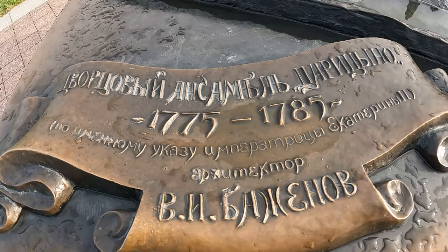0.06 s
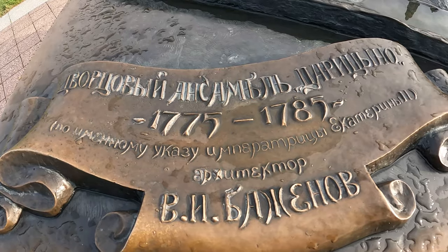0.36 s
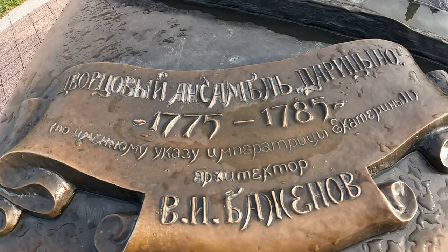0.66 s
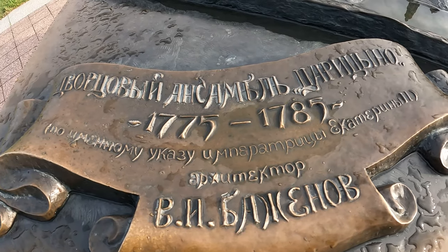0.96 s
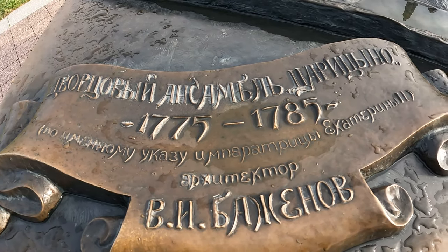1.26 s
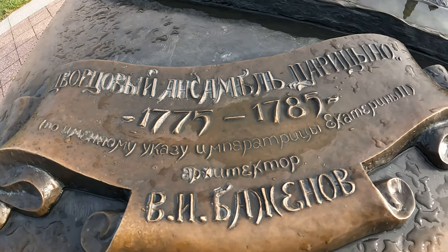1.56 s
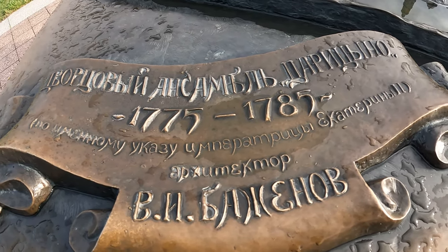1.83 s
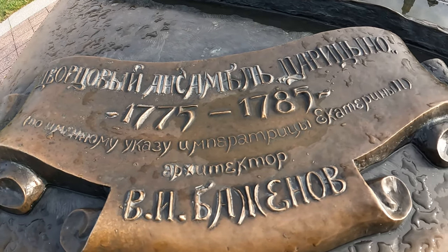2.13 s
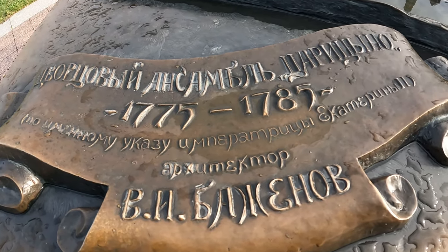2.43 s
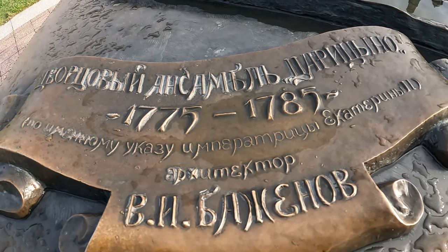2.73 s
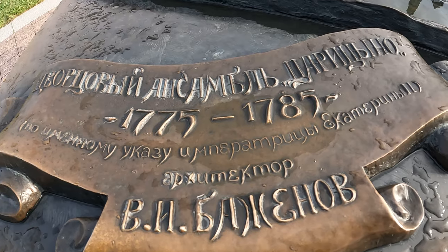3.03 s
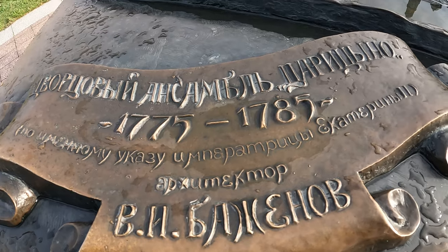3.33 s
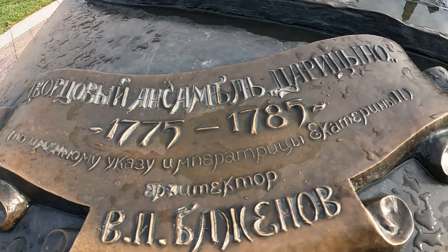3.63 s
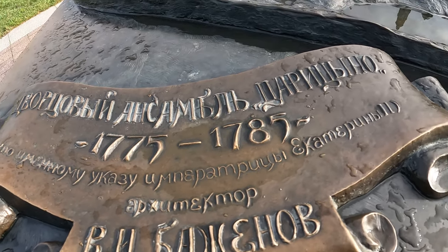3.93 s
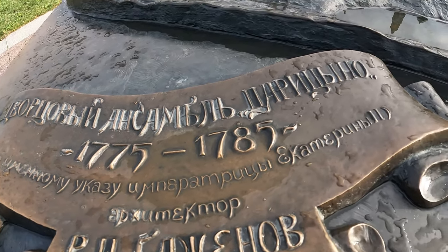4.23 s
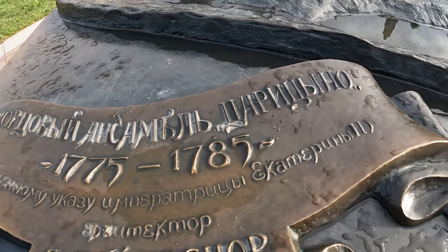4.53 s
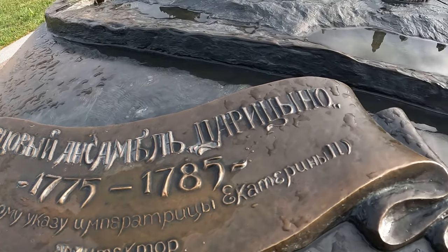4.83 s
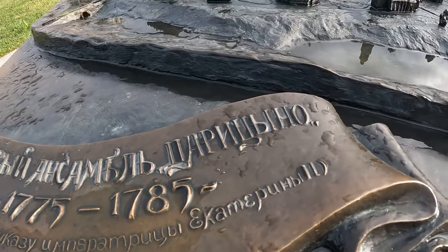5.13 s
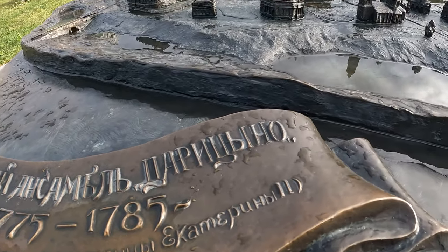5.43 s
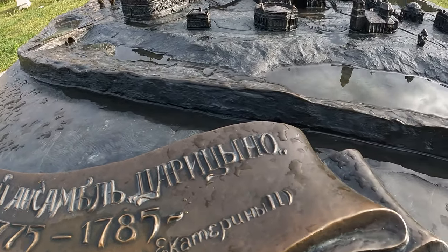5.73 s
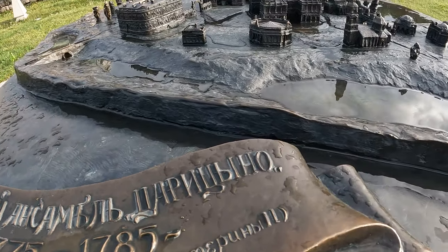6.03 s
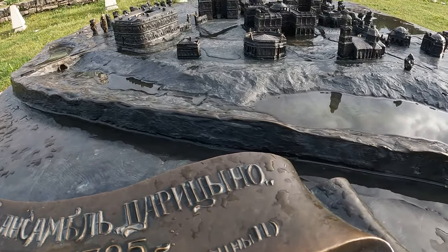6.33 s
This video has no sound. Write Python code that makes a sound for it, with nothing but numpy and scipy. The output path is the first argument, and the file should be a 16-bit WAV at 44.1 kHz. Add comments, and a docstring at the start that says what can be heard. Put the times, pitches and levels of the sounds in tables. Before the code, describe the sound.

A firm, close click on a hand-held camera comes right at the start, with a low buffet of breeze. The sound drops out for an instant and fades back by about 0.2 seconds into distant road traffic heard from an open park: a steady low engine rumble under dull tyre hiss. It eases slightly around 1.5 seconds, then builds gently and widens from about 2.5 seconds, with very faint thin whines near 5 seconds.

Throughout, fingers shift on the camera, close and mostly on the left. Small ticks come at 0.6 seconds, a soft thud at 1.1, and faint skin rubbing follows. Around 3.2 seconds there are more ticks and a tiny, faint falling squeak. Light ticks scatter between 4 and 4.7 seconds, ending in a brief rub. Another low thud with ticks lands near 5.5 seconds, and a sharper tick at 6.3.

```python
"""Open park: far traffic, engine rumble under a wash of tyre noise, with a few thin whines.
A hand-held camera clicks once; the sound drops out, fades back in near mono and slowly widens.
Fingers shift on the case: ticks ring its modes, nudges thud, skin rubs close to the left microphone.
Breeze and brief handling thuds buffet the microphones; one faint squeak falls in pitch."""
import sys
import numpy as np
from scipy import signal
from scipy.fft import rfft, irfft, next_fast_len
from scipy.io import wavfile
from scipy.ndimage import uniform_filter1d, map_coordinates

SR = 44100
rng = np.random.default_rng(int(sys.argv[2]) if len(sys.argv) > 2 else 0)


def waveform_to_disk(signal):
    """Save audio, clipped to [-1, 1], as 16-bit WAV at the path in sys.argv[1]."""
    frames = np.transpose(np.atleast_2d(signal))
    scaled = np.clip(frames, -1, 1) * 32767
    samples = np.round(scaled).astype(np.int16)
    wavfile.write(sys.argv[1], SR, samples)


N = 280917
TOP_HZ = 15600  # camera band limit


def amp(db):
    """Decibels to gain."""
    return 10 ** (np.asarray(db) / 20)


def unit(x):
    """x at rms 1."""
    return x / np.sqrt(np.mean(x ** 2) + 1e-20)


def gain_at(spectrum, hz):
    """Gain from (f/Hz, level/dB) points, interpolated over log frequency."""
    f, db = np.transpose(spectrum)
    return amp(np.interp(np.log(hz + 1), np.log(f + 1), db))


def curve(points):
    """(t/s, value) points, interpolated per sample."""
    return np.interp(np.arange(N) / SR, *np.transpose(points))


def wobble(rate_hz):
    """Smooth random curve, rate_hz knots a second."""
    knots = rng.standard_normal(int(N * rate_hz / SR) + 4)
    return map_coordinates(knots, [np.arange(N) * rate_hz / SR])


def swell(peak_s, half_width_s):
    """Gaussian envelope: 1 at the peak, 1/e at the half-width."""
    return np.exp(-((np.arange(N) / SR - peak_s) / half_width_s) ** 2)


def filtered(x, response):
    """Zero-phase filter with gain response(hz)."""
    size = next_fast_len(N + SR // 2)
    return irfft(rfft(x, size) * response(np.fft.rfftfreq(size, 1 / SR)), size)[..., :N]


def add(track, start_s, sound):
    """Mix a stereo sound into the track."""
    part = track[:, max(0, round(start_s * SR)):][:, :sound.shape[1]]
    part += sound[:, :part.shape[1]]


def pan(left_db):
    """Stereo gains, left_db louder on the left."""
    return amp([[left_db / 2], [-left_db / 2]])


def far_noise(spectrum, patchy_db):
    """Stereo noise, mid at rms 1; moving air makes patches of it swell and fade."""
    side_gain = [(60, -33.5), (200, -34), (450, -14), (1000, -11.5), (1700, -0.5), (2300, -2), (3000, -7.5),
                 (8000, -2.5)]  # side against mid: f/Hz, level/dB
    bins = signal.stft(rng.standard_normal((2, N)), nperseg=1024)[2]
    patches = uniform_filter1d(rng.standard_normal(bins.shape[1:]), size=6, axis=0)
    patches = uniform_filter1d(patches, size=10, axis=1)
    pair = signal.istft(bins * amp(patchy_db * unit(patches)), nperseg=1024)[1][:, :N]
    mid, side = filtered(pair, lambda hz: gain_at(spectrum, hz) * (hz < 2 * spectrum[-1][0]))
    side = filtered(side, lambda hz: gain_at(side_gain, hz))
    return np.array([mid + side, mid - side]) / np.std(mid)


def engines():
    """Many exhausts blur into low rumble, drone and wavering notes, which start louder and settle."""
    rumble_spectrum = [(12, -16), (22, -7.5), (36, 1), (54, -2.5), (72, -4.5), (97, -4), (125, -9),
                       (165, -21), (300, -63.5)]  # deep exhaust noise: f/Hz, level/dB
    drone_spectrum = [(80, -28.5), (130, 0), (165, -1.5), (205, 1.5), (240, -2), (315, -3), (400, -7.5),
                      (500, -13.5), (700, -21.5), (1500, -71.5)]  # low-mid exhaust noise: f/Hz, level/dB
    engine_notes = [(53.77, 19, -38.5, 7.5), (100.7, 8, -50, -4), (213.8, 8, -60.5, 16.5),
                    (352.6, 14, -60.5, 15.5)]  # steady notes: f/Hz, waver rate/Hz, level/dB, lift at opening/dB
    rumble_db, rumble_lift_db, lift_below_hz = -34.5, 5.5, 104
    drone_db, drone_lift_db, sag_db_per_s = -40, 6.5, 0.48
    t = np.arange(N) / SR
    opening_swell = swell(peak_s=0.18, half_width_s=0.67)
    rumble = amp(rumble_db + 0.58 * wobble(9.3)) * far_noise(rumble_spectrum, patchy_db=0.13)
    deep = filtered(rumble, lambda hz: 1 / (1 + (hz / lift_below_hz) ** 8))
    out = rumble - deep + deep * amp(rumble_lift_db * opening_swell)
    drone = far_noise(drone_spectrum, patchy_db=1.0)
    out += amp(drone_db + drone_lift_db * opening_swell - sag_db_per_s * t) * drone
    for hz, waver_hz, db, lift_db in engine_notes:
        flutter = 1 + 0.58 * wobble(waver_hz)
        note = np.cos(2 * np.pi * hz * t + 0.89 * wobble(waver_hz))
        out += amp(db + lift_db * opening_swell) * unit(flutter * note)
    return out


def tyres():
    """Tyre roar, dulled by distance, under thin hiss; more traffic is louder and brighter."""
    traffic_flow = [(0.35, -42), (0.8, -45.5), (1.5, -48), (2.1, -46.5), (3.5, -45.5), (4.15, -44),
                    (5.1, -43.5), (5.8, -44), (6.25, -42.5)]  # stream of cars: t/s, level/dB
    roar_spectrum = [(250, -14.5), (480, -9), (590, -1.5), (640, -3.5), (715, 2.1), (780, -0.5), (850, -4),
                     (950, -3), (1120, -8), (1300, -18.5), (2000, -35), (4000, -73.5)]  # tyre roar: f/Hz, level/dB
    hiss_spectrum = [(700, -26), (1200, 2.5), (1440, 4), (1700, 1), (2000, -3), (2300, -9), (3000, -19.5),
                     (5000, -57.5)]  # tyre hiss: f/Hz, level/dB
    treble_spectrum = [(1200, -24.5), (2100, 0), (2600, 2), (3300, -1.5), (4700, -8.5), (6300, -16),
                       (7700, -20.5), (9000, -37), (11000, -43.5), (12200, -35), (13500, -48.5)]  # high hiss: f/Hz, level/dB
    treble_contour = [(0.3, -62.5), (0.95, -67), (1.7, -64), (2.6, -68), (3.6, -68.5), (4.4, -66.5),
                      (5.1, -65.5), (5.9, -64)]  # high hiss contour: t/s, level/dB
    flow_db = curve(traffic_flow)
    mean_db = flow_db.mean()
    surge_db = flow_db - mean_db
    roar_db = mean_db + 0.4 + 0.85 * surge_db + 0.15 * wobble(6.0)
    roar = amp(roar_db) * far_noise(roar_spectrum, patchy_db=0.85)
    hiss = amp(mean_db - 10 + 1.4 * surge_db) * far_noise(hiss_spectrum, patchy_db=0.8)
    treble = amp(curve(treble_contour) + 1) * far_noise(treble_spectrum, patchy_db=1.5)
    return (roar + hiss + treble) * pan(1.5)


def buffets():
    """Low buffets at the microphones: breeze and brief handling thuds, independent noise per side."""
    bursts = [(0.036, 0.12, -23.5), (1.126, 0.013, -31), (4.693, 0.12, -38.5), (5.464, 0.062, -32)]  # low buffets: peak t/s, half-width/s, level/dB
    buffet_spectrum = [(20, 6), (70, -13.5), (200, -12.5), (500, -25.5), (1500, -39), (5000, -51),
                       (12000, -66), (15500, -92.5)]  # buffet noise: f/Hz, level/dB
    strength = sum(amp(db) * swell(peak_s, half_width_s) for peak_s, half_width_s, db in bursts)
    return strength * unit(filtered(rng.standard_normal((2, N)), lambda hz: gain_at(buffet_spectrum, hz)))


def case_ring(t, attack_s, favoured_hz=None):
    """Short case modes; those near the pitch the touched spot favours ring louder and longer."""
    modes = [(1127, -7, 3.5, 0.015), (1560, 4, 5, 0.0071), (2020, -1, 1.5, 0.015), (2910, -24, 0.5, 0.0053),
             (3270, -10.5, -7.5, 0.01), (4600, -13.5, -34, 0.0042), (6200, -9.5, -33, 0.0057),
             (7550, 2, -22, 0.005), (9880, -10, -32.5, 0.0057), (12160, -9.5, -50, 0.0044)]  # case modes: f/Hz, left level/dB, right level/dB, T60/s
    favour_db, reach_octaves, left_lag_s = 7, 0.2, 0.00032
    out = np.zeros((2, len(t)))
    t = np.maximum(t - np.array([[left_lag_s], [0]]), 0)
    for hz, left_db, right_db, t60_s in modes:
        near = np.exp(-(np.log2(hz / favoured_hz) / reach_octaves) ** 2) if favoured_hz else 0
        db = rng.normal(0, 1) + favour_db * near - 60 * t / (t60_s * (1 + near))
        out += amp([[left_db], [right_db]]) * amp(db) * np.sin(2 * np.pi * hz * t)
    return out * (1 - np.exp(-t / attack_s)) * [[-1], [1]]  # case rocks: ports move opposite ways


def click():
    """One firm click rings the case over a low thump."""
    start_s, ring_db, thump_db, thump_rise_s = 0.0348, -5.5, -15.5, 0.0036
    out, t = np.zeros((2, N)), np.arange(SR // 20) / SR
    push = t / thump_rise_s
    thump = amp(thump_db) * push ** 2 * np.exp(2 - 2 * push)
    add(out, start_s, amp(ring_db) * case_ring(t, attack_s=0.00073) + thump)
    return out


def ticks():
    """The grip shifts: each tick is a crack, dulled by the soft fingertip, plus case ring."""
    clear_ticks = [(0.5713, -37.5, -13, 1100), (0.593, -42, -13, 3250), (1.1114, -53, -6, 12200),
                   (1.124, -41.5, -12, 12200), (3.190, -42.5, -9, 12200), (3.273, -43, -13, 12200),
                   (3.604, -55, -3, 12200), (4.047, -46.5, -6, 12200), (4.1184, -50, -8, 12200),
                   (4.289, -48, -13, 7500), (4.3519, -53, -11, 7500), (4.621, -55, 0, 12200),
                   (4.6683, -40, -4, 1500), (5.425, -46, -5, 12200), (5.446, -39, -2, 12200),
                   (5.5007, -38.5, -11, 3250), (6.1396, -48, -8, 12200), (6.2998, -28, -8, 1100)]  # case ticks: t/s, crack gain/dB, ring re crack/dB, favoured f/Hz
    faint_ticks = [(rng.uniform(3.8, N / SR), rng.normal(-63, 1.5), 3, 12200) for _ in range(4)]
    crack_cutoff_hz, crack_t60_s = 3580, 0.012
    out, t = np.zeros((2, N)), np.arange(SR // 20) / SR
    for start_s, db, ring_db, favoured_hz in clear_ticks + faint_ticks:
        crack = signal.lfilter(*signal.butter(2, crack_cutoff_hz, fs=SR), rng.standard_normal((2, len(t))))
        crack *= amp(-60 * t / crack_t60_s) * pan(8.4)
        ring = amp(ring_db) * case_ring(t, attack_s=0.0009, favoured_hz=favoured_hz)
        add(out, start_s, amp(db) * (ring + crack))
    return out


def bumps():
    """The hand nudges the camera: a low push and rebound with a gritty scuff."""
    nudges = [(0.593, -36, -52.5, 1000), (.596, -52, -53.5, 2970), (1.126, -22, -44, 1300),
              (3.196, -44, -60, 2730), (4.58, -55, -62.5, 4630), (5.446, -21.5, -56, 1100),
              (5.501, -46, -58, 3300), (6.299, -42.5, -44, 1400)]  # hand nudges: t/s, thud level/dB, scuff level/dB, scuff f/Hz
    thud_hz, thud_t60_s, scuff_octaves, scuff_t60_s = 110, 0.053, 1.3, 0.064
    out, t = np.zeros((2, N)), np.arange(SR // 10) / SR
    for start_s, thud_db, scuff_db, scuff_hz in nudges:
        thud = amp(thud_db - 60 * t / thud_t60_s) * np.sin(2 * np.pi * thud_hz * t)
        band_hz = np.minimum(scuff_hz * 2 ** (scuff_octaves * np.array([-0.5, 0.5])), TOP_HZ)
        grit = signal.lfilter(*signal.butter(2, band_hz, "bandpass", fs=SR), rng.standard_normal(len(t)))
        scuff = amp(scuff_db - 60 * t / scuff_t60_s) * unit(grit)
        add(out, start_s, pan(0) * (thud + scuff))
    return out


def rubs():
    """Skin slides over the case in grainy strokes, each with its own brightness."""
    strokes = [(0.615, 0.097, -63, -16), (1.1, 0.066, -63.5, 6), (1.395, 0.21, -66.5, 2.5),
               (1.585, 0.049, -64.5, 16), (1.711, 0.089, -71, 15), (1.966, 0.098, -70, 12.5),
               (2.153, 0.76, -71.5, 0.5), (3.232, 0.06, -69, 1), (4.3, 0.76, -73, -5.5),
               (4.685, 0.02, -60.5, -1), (4.724, 0.06, -54, 2.5), (5.454, 0.011, -56, 6),
               (5.504, 0.0066, -56.5, 3.5), (5.805, 1, -70, -3), (6.325, 0.05, -66.5, 0.5)]  # finger strokes: peak t/s, half-width/s, level/dB, treble gain/dB
    skin_spectrum = [(800, -3.5), (2000, 8), (2800, 2), (3800, -2), (5000, -1.5), (6200, -6), (7600, -5),
                     (8500, -12.5), (10200, -13), (11200, -14), (12200, -2), (13500, -19.5), (14600, -20),
                     (15500, -17)]  # skin friction: f/Hz, level/dB
    grit_db, grains_per_s, treble_hz = 2.3, 520, 9500
    scrape = unit(filtered(rng.standard_normal((2, N)), lambda hz: gain_at(skin_spectrum, hz)))
    scrape *= unit(amp(grit_db * wobble(grains_per_s)))
    treble = filtered(scrape, lambda hz: 1 / (1 + (treble_hz / (hz + 1)) ** 8))
    body = (scrape - treble) * pan(6.3)
    treble *= amp([[0], [-12]])
    out = np.zeros((2, N))
    for peak_s, half_width_s, db, treble_db in strokes:
        stroke = amp(db) * swell(peak_s, half_width_s) ** 2  # 1/e^2 at the half-width
        out += stroke * (body + amp(treble_db) * treble)
    return out


def whines():
    """Far vehicles sing in thin, unsteady notes that drift with their speed and come and go."""
    vehicle_notes = [(2.6, 0.76, 1402, -66.5), (5.2, 1.6, 1453, -63), (5.2, 0.84, 773, -55),
                     (5.25, 0.72, 1800, -61)]  # whines: peak t/s, half-width/s, f/Hz, level/dB
    drift_share, waver_hz = 0.006, 52
    out = np.zeros(N)
    for peak_s, half_width_s, hz, db in vehicle_notes:
        cycles = hz * np.cumsum(1 + drift_share * wobble(3)) / SR
        note = np.cos(2 * np.pi * cycles + 1.3 * wobble(waver_hz)) * amp(1.8 * wobble(8))
        out += amp(db) * swell(peak_s, half_width_s) * unit(note)
    return out


def squeak():
    """A brief, faint squeak whose partials slide down together."""
    partials = [(3130, -70), (4040, -77), (4530, -72.5)]  # squeak partials: f/Hz, level/dB
    peak_s, half_width_s, fall_share_per_s = 3.222, 0.042, 1.0
    slide_s = np.clip(np.arange(N) / SR - peak_s, -2 * half_width_s, 2 * half_width_s)
    warped_s = np.cumsum(1 - fall_share_per_s * slide_s + 0.009 * wobble(400)) / SR
    tone = sum(amp(db) * np.sin(2 * np.pi * hz * warped_s) for hz, db in partials)
    return swell(peak_s, half_width_s) * amp(2.5 * wobble(120)) * tone


def scene():
    """Far traffic, a little wind and the hand on the camera."""
    traffic = engines() + tyres() + whines()
    return traffic + buffets() + rubs() + squeak() + bumps() + click() + ticks()


def record(dry):
    """Band-limited camera: drops out, fades back in mono except for the top treble, then widens."""
    cut_s, cut_ramp_s, return_s, fade_s = 0.076, 0.003, 0.142, 0.08
    first_width_db, widen_from_s, widen_per_s, stereo_above_hz = 1.5, 2.46, 0.32, 10000
    t = np.arange(N) / SR
    mid, side = (dry[0] + dry[1]) / 2, (dry[0] - dry[1]) / 2
    top = filtered(side, lambda hz: 1 / (1 + (stereo_above_hz / (hz + 1)) ** 12))
    width = np.where(t < cut_s, amp(first_width_db), np.clip((t - widen_from_s) * widen_per_s, 0, 1))
    side = top + (side - top) * width
    before_cut = np.clip((cut_s - t) / cut_ramp_s, 0, 0.7)
    fade_in = np.clip((t - return_s) / fade_s, 0, 1) ** 1.7
    return filtered(np.array([mid + side, mid - side]) * (before_cut + fade_in), lambda hz: hz < TOP_HZ)


dry = scene()
out = record(dry)
waveform_to_disk(out)
```